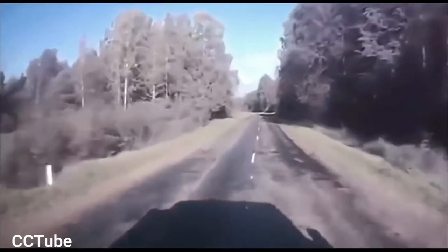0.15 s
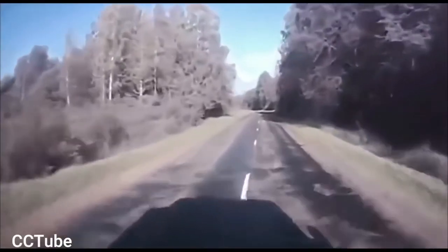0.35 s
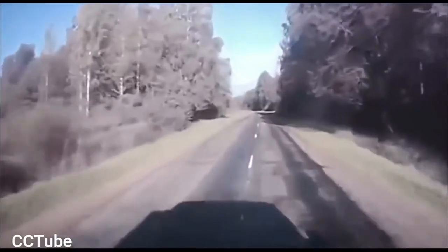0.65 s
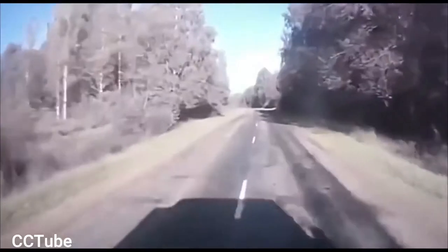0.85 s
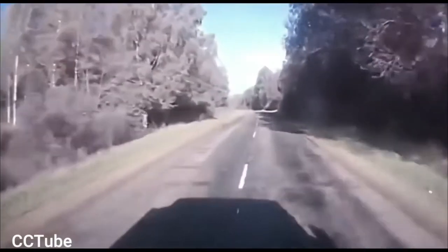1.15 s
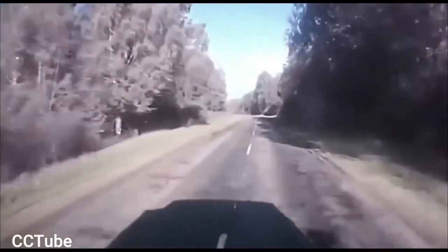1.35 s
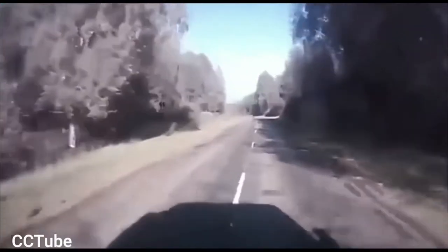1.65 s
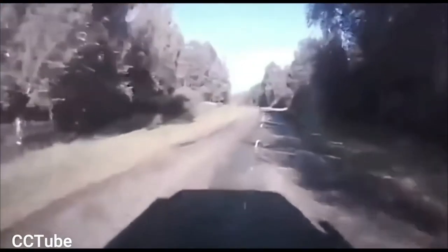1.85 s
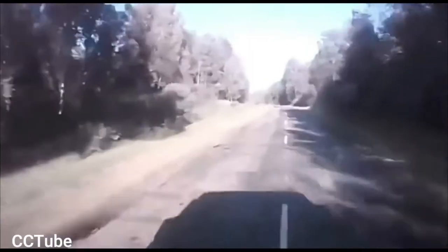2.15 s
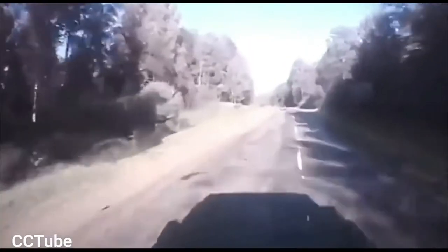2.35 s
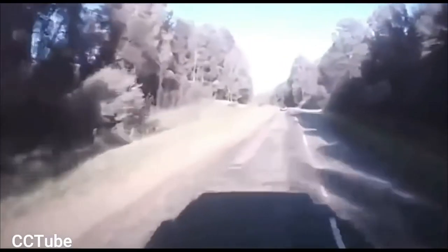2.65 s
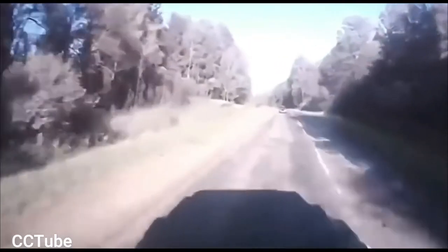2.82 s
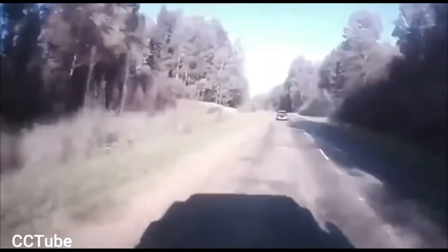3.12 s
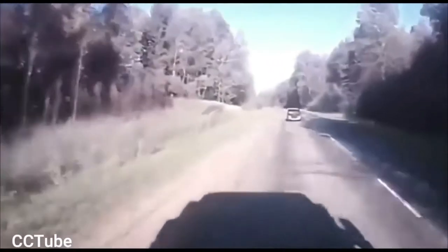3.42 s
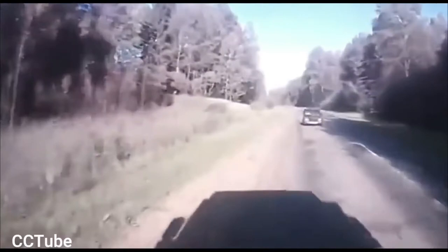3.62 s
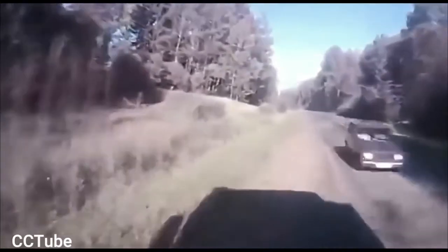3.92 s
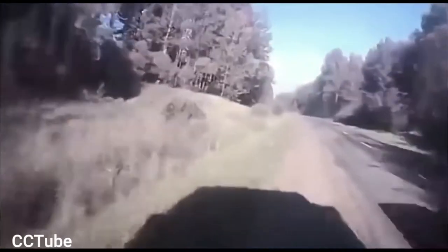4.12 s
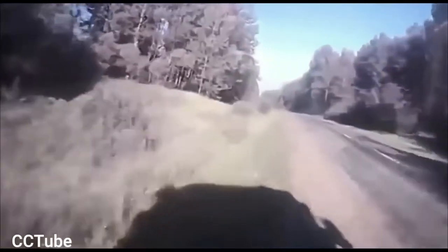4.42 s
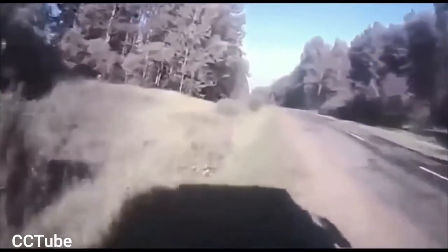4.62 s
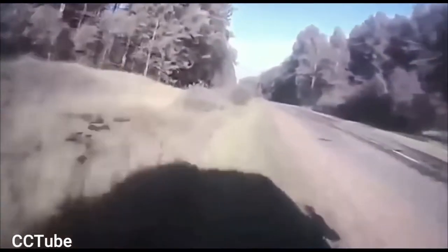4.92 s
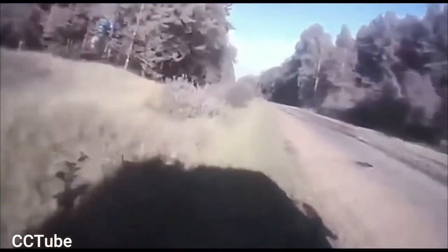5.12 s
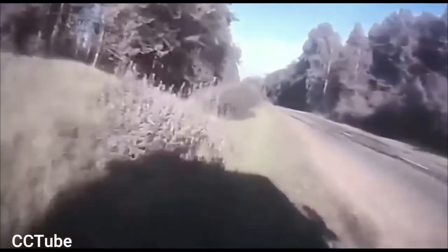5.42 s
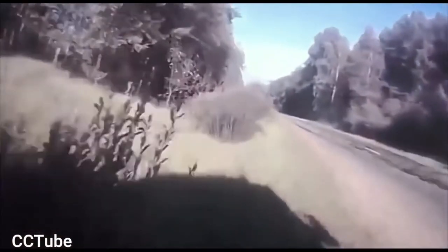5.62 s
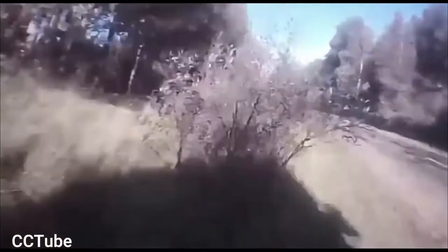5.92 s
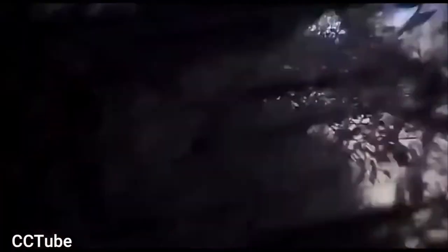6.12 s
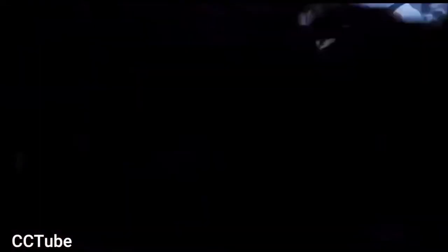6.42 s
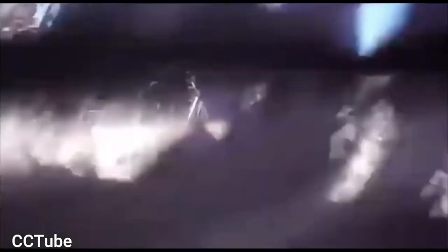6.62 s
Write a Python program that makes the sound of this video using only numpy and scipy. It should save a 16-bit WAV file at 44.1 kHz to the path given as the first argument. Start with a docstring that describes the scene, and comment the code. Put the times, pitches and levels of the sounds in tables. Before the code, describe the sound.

Quiet road roar breaks into a loud bang and rapid clattering knocks from torn tread, easing slightly before twigs and branches smack the car.

```python
"""Inside a car on a country road: body sway, tyre roar and buzzing trim; once a second the wave jumps.
After one soft knock the tyre bursts, and a cheap windscreen camera overloads from the burst on: wave tops flatten
and gain control pulls down. The torn tread slaps the wheel arch once a turn, as clicks and pushes ringing through
panel modes, while the car leaves the road and bumps over the verge. At the end it ploughs into brush: twigs whip,
branches strike, stems drag."""
import sys
import numpy as np
from scipy import signal
from scipy.fft import rfft, irfft
from scipy.io import wavfile
from scipy.ndimage import uniform_filter1d

SR = 44100
rng = np.random.default_rng(int(sys.argv[2]) if len(sys.argv) > 2 else 0)


def digitize_waveform(pressure):
    """Quantize a signal to 16-bit integers and store it at the path in sys.argv[1].

    Rows of a 2-D input are taken as channels; values are limited to [-1, 1].
    """
    field = np.atleast_2d(pressure).T
    bounded = np.clip(field, -1, 1)
    quanta = np.round(bounded * 32767).astype(np.int16)
    wavfile.write(sys.argv[1], SR, quanta)


N = 298557

# Levels of the rolling car, leaping at the burst: [t/s, body sway level/dB, tyre roar level/dB, cabin buzz level/dB]
ROLLING_LEVELS = [(0.0, -68.5, -57, -68.5), (0.5, -77, -52.5, -67.5), (1.0, -79.5, -49.5, -61),
                  (1.4, -77, -45.5, -61.5), (1.75, -47.5, -47.5, -56), (1.77, -19, -29.5, -56.5),
                  (1.95, -38, -35, -41), (2.3, -38.5, -40.5, -37.5), (2.55, -46.5, -37.5, -37),
                  (2.78, -43.5, -38, -49.5), (3.08, -35, -34.5, -34), (3.75, -50.5, -40, -42.5),
                  (4.25, -42, -35, -34), (4.85, -42.5, -36, -39), (5.3, -43.5, -44.5, -42.5),
                  (5.75, -49, -45, -50), (6.2, -36.5, -38.5, -43), (6.77, -56, -27.5, -21.5)]
# Spectrum of the swaying body's pressure swings: [f/Hz, level per Hz/dB]
SWAY_SPECTRUM = [(4, -18.5), (9, -3.5), (15, -1.5), (25, -5.5), (35, -11), (50, -19.5), (70, -39)]
# Spectrum of the tyre roar: [f/Hz, level/dB]
ROAR_SPECTRUM = [(25, -14), (45, -14), (120, -18.5), (270, -24), (480, -31), (630, -25.5), (900, -34),
                 (2100, -42), (2500, -73.5), (5000, -80)]
# Spectrum of the loose trim's buzz: [f/Hz, level per Hz/dB]
BUZZ_SPECTRUM = [(180, -25.5), (300, -2.5), (500, -4), (712, -15.5), (1200, -7), (1860, -15.5), (4260, -29),
                 (5500, -34), (7150, -87), (12100, -120)]
# A soft knock before the burst, then blows of the burst and of the flailing tread; a second, later contact
# follows each; levels before the layer mix:
# [t/s, rattle level/dB, thud level/dB, crack level/dB, knock f/Hz, second contact delay/s, its rattle level/dB]
BLOWS_AND_ENDS = [(1.5, -45.5, -46, -50, 258, .03, -58.5), (1.767, -8.5, -17, -8, 248.3, .013, -11),
                  (1.804, -15.5, -22, -11.5, 298, 0.0083, -32), (1.822, -17, -23.5, -22, 255, 0.014, -26),
                  (1.858, -19, -16, -29.5, 265, 0.016, -30), (1.894, -10, -18, -24, 270, 0.041, -26),
                  (2.02, -13.5, -20.5, -22, 273, 0.028, -25.5), (2.09, -16.5, -28, -44.5, 502, .027, -24),
                  (2.157, -16.5, -20.5, -41, 443, 0.011, -28), (2.25, -39, -38, -57.5, 291, 0.017, -42),
                  (2.33, -18.5, -22, -31, 415, 0.016, -24.5), (2.37, -20, -47, -29.5, 313, 0.016, -29),
                  (2.444, -43.5, -42, -40, 374, .03, -51.5), (2.521, -23, -42.5, -28, 454, 0.045, -19.5),
                  (2.732, -38.5, -35, -62.5, 325, 0.025, -54.5),
                  (2.796, -13.5, -30, -30, 350, 0.053, -34.5), (2.924, -29.5, -29.5, -48, 361, .03, -44),
                  (2.987, -10, -25, -26, 405, 0.046, -35), (3.153, -7.5, -30.5, -23.5, 538, .017, -24.5),
                  (3.351, -15, -16.5, -25, 277, 0.035, -31.5), (3.408, -32.5, -40, -44, 227, .015, -42.5),
                  (3.482, -36.5, -31.5, -43, 228, .03, -64),
                  (3.553, -14.5, -20.5, -29, 304.5, 0.024, -33.5),
                  (3.666, -32, -40.5, -40.5, 466, .03, -47), (3.734, -7, -20, -18, 251, .033, -19),
                  (3.825, -30, -34.5, -56, 268, .03, -53), (3.913, -26.5, -35, -56.5, 251, .064, -28.5),
                  (4.02, -17.5, -18.5, -26.5, 352, 0.042, -27.5),
                  (4.136, -13, -20, -25.5, 350, .037, -29.5), (4.257, -19, -24.5, -31.5, 452, 0.029, -29.5),
                  (4.371, -16.5, -26.5, -31, 362, .026, -25), (4.483, -23, -34, -33, 273.5, 0.027, -26.5),
                  (4.599, -18, -21, -27, 381, 0.019, -24), (4.712, -15, -22, -26, 516, .037, -27),
                  (4.839, -14.5, -25.5, -30, 367, 0.034, -37), (4.954, -18, -30.5, -33, 330, .029, -28),
                  (5.085, -17.5, -42, -45, 529, 0.022, -43.5), (5.18, -40, -40.5, -47.5, 238, 0.016, -46),
                  (5.221, -23.5, -29, -47.5, 509, .03, -45), (5.313, -32, -34, -43.5, 372, 0.045, -27.5),
                  (5.47, -39.5, -36, -51.5, 358, 0.029, -37), (5.516, -29, -28, -43.5, 425, 0.026, -47),
                  (5.636, -33, -43, -54.5, 300, 0.027, -36.5), (5.794, -44.5, -39.5, -46, 223, 0.011, -39),
                  (5.82, -26.5, -29, -34, 360, 0.023, -27.5), (5.934, -27, -40, -39, 372, 0.035, -23),
                  (6.111, -22.5, -26.5, -33.5, 352, 0.029, -31),
                  (6.404, -18, -20.5, -33.5, 343, .03, -46.5)]
# Modes of the floor pan: [f/Hz, level/dB, t60/s]
FLOOR_MODES = [(39, -5.5, 0.15), (68, -9, 0.19), (106.4, 9.5, 0.088), (151, -0.5, 0.069)]
# Modes of the arch and panels: [f/Hz, level/dB, t60/s]
PANEL_MODES = [(258, -22.5, 0.0096), (350, 3, 0.032), (494.7, 6.5, 0.038), (627.4, 0, 0.049),
               (805, 4, 0.023), (1061, 2, 0.021), (1208, 11, 0.0081)]
# Modes of the loose trim: [f/Hz, level/dB, t60/s]
TRIM_MODES = [(1620, 15, 0.0034), (2180, 7.2, 0.0088), (2840, 0.5, 0.01), (4220, 0.5, 0.0099),
              (5410, 1, 0.017)]
# Stems dragged under the floor, level before the layer mix: [t/s, level/dB]
STEM_LEVELS = [(6.235, -44.5), (6.283, -22.5), (6.395, -36.5), (6.473, -27), (6.55, -27), (6.7, -38.5),
               (6.77, -33.5)]
# Bunches of twigs that whip across the car, level before the layer mix: [start t/s, length/s, level/dB]
TWIG_BUNCHES = [(6.272, 0.011, -24), (6.28, 0.014, -10.5), (6.297, 0.016, -25), (6.328, 0.011, -26),
                (6.35, 0.014, -36), (6.411, 0.051, -31.5), (6.44, 0.021, -25.5), (6.474, 0.012, -29),
                (6.501, 0.057, -12.5), (6.576, 0.05, -24), (6.642, 0.029, -31), (6.657, 0.029, -23),
                (6.711, 0.016, -34.5), (6.723, 0.025, -17.5)]
# Single branches that strike hard, starting level before the layer mix: [t/s, level/dB]
BRANCH_STRIKES = [(6.2505, -27.5), (6.2623, -20.5), (6.2818, -34), (6.327, -19), (6.454, -16),
                  (6.4953, 2.5), (6.5172, -7.5), (6.583, -13), (6.6505, -7), (6.67, -10), (6.715, -24.5),
                  (6.7291, -16)]
# Modes of the sheet metal and glass under the branches: [f/Hz, level/dB, t60/s]
SKIN_MODES = [(497, -20.5, 0.0042), (811, -13, 0.048), (1230, -2.5, 0.012), (1610, 10, 0.0057),
              (2177, 4, 0.012), (2935, -2.5, 0.014), (4500, 6.5, 0.0021)]
# Microphone that leans to the bass: [f/Hz, level/dB]
CAPSULE_RESPONSE = [(20, 6.5), (4600, -6.5)]
# Narrow audio path of the camera: [f/Hz, level/dB]
PATH_RESPONSE = [(20, 3), (300, -0.5), (4600, -6), (5300, -15), (5900, -30), (6500, -28.5), (8800, -26.5),
                 (10000, -36), (15000, -50.5)]
# Jumps of the wave in turn, before their treble is softened: [signed height]
JUMP_HEIGHTS = [.07, -.06, -.045, -.04, -.05, .07]

BURST_S = 1.765
BLOW_T60_S = 0.072  # basic die-away of a blow, stretched for each layer
END_THUD_DB, END_CRACK_DB = -1.5, -12  # loose end's thud and crack against its rattle
END_LOW_HZ, END_HIGH_HZ = 234, 536  # the loose end lands anywhere on the arch
SCRAPE_DB, SCRAPE_SWELL_S = -9.5, 0.043  # the tread drags along the arch around each blow
WHIP_IN_S, WHIP_OUT_T60_S = 0.0014, 0.058
FIRST_JUMP_S, JUMP_EVERY_S = 1.0779, .99844
EDGE_HZ = 15700  # top of the recorded band


def gain_of(db):
    """Turns decibels into an amplitude factor."""
    return 10 ** (np.asarray(db) / 20)


def evened(x):
    """Brings a signal to an rms of 1."""
    return x / np.sqrt(np.mean(x ** 2) + 1e-20)


def read(points, hz):
    """Reads a response in dB, drawn straight between its points on a log frequency axis."""
    f, db = np.transpose(points)
    return np.interp(np.log(hz + 1), np.log(f + 1), db)


def along(rows, column):
    """Gain that follows one dB column of a curve, silent before it starts."""
    rows = np.asarray(rows)
    return gain_of(np.interp(np.arange(N) / SR, rows[:, 0], rows[:, column], left=-200))


def coloured(x, points):
    """Shapes a signal's spectrum by a drawn response, leaving its phase alone."""
    response = gain_of(read(points, np.fft.rfftfreq(N, 1 / SR)))
    return irfft(rfft(x) * response, N)


def clicks(per_s, spread_db):
    """Random clicks of either sign, their sizes spread in dB, at an rms of 1."""
    size_db = spread_db * np.minimum(rng.exponential(1, N), 4)
    size = gain_of(size_db) * rng.choice([-1, 1], N)
    return evened(size * (rng.random(N) < per_s / SR))


def ring(drive, modes):
    """Passes a drive through dying sine modes of total energy 1."""
    t = np.arange(SR // 4) / SR
    tap = sum(gain_of(db - 60 * t / t60) * np.sin(2 * np.pi * hz * t) for hz, db, t60 in modes)
    return signal.oaconvolve(drive, tap / np.linalg.norm(tap))[:N]


def scattered(drive, modes, spread):
    """Contacts wander over five spots, where the same modes lie a little higher or lower."""
    spot = rng.integers(0, 5, N // 200 + 1).repeat(200)[:N]  # a new draw every 200 samples
    total = np.zeros(N)
    for k, shift in enumerate(np.linspace(1 - spread, 1 + spread, 5)):
        shifted_modes = [(hz * shift, db, t60) for hz, db, t60 in modes]
        total += ring(drive * (spot == k), shifted_modes)
    return total


def rolling():
    """Slow pressure swings of the swaying body, tyre roar, and loose trim that buzzes as dense clicks."""
    sway_noise, roar_noise, lump_noise = rng.standard_normal((3, N))
    sway = evened(coloured(sway_noise, SWAY_SPECTRUM))
    # roar and buzz swell and fade together, by 3.2 dB rms
    lumps = gain_of(3.2 * evened(coloured(lump_noise, [(3, 0), (20, -3), (60, -30)])))
    roar = evened(lumps * coloured(roar_noise, ROAR_SPECTRUM))
    buzz = evened(lumps * coloured(clicks(2500, spread_db=0.0), BUZZ_SPECTRUM))
    sway = along(ROLLING_LEVELS, column=1) * sway
    roar = along(ROLLING_LEVELS, column=2) * roar
    buzz = along(ROLLING_LEVELS, column=3) * buzz
    return sway + roar + buzz


def contacts():
    """Every blow and second contact as [t/s, rattle level/dB, thud level/dB, crack level/dB, knock f/Hz]."""
    blows = np.array(BLOWS_AND_ENDS)
    end_s = blows[:, 0] + blows[:, 5]
    end_db = blows[:, 6]
    end_hz = END_LOW_HZ + (END_HIGH_HZ - END_LOW_HZ) * rng.random(len(blows))
    ends = np.transpose([end_s, end_db, end_db + END_THUD_DB, end_db + END_CRACK_DB, end_hz])
    return np.vstack([blows[:, :5], ends])


def blow_envelope(hits, column, stretch, rise_s):
    """Power sum of the blows: each rises, holds briefly, then drops away."""
    power, t = np.zeros(N + SR), np.arange(SR // 4) / SR
    fall = gain_of(-60 * (t / (stretch * BLOW_T60_S)) ** 1.663)  # the exponent makes the hold
    shape = (1 - np.exp(-t / rise_s)) * fall
    for row in hits:
        power[round(row[0] * SR):][:len(t)] += (shape * gain_of(row[column])) ** 2
    return np.sqrt(power[:N])


def tread():
    """Each blow thumps the floor pan, knocks the arch, shakes panels and cracks trim; after the burst it scrapes."""
    hits = contacts()
    push, knock, t = np.zeros(N), np.zeros(N + SR), np.arange(SR // 5) / SR
    for s, rattle_db, thud_db, _, hz in hits:
        push[round(s * SR)] -= gain_of(thud_db)
        swing = np.sin(2 * np.pi * hz * t) * (1 - np.exp(-t / 0.00057))
        knock[round(s * SR):][:len(t)] -= gain_of(rattle_db - 60 * t / (1.33 * BLOW_T60_S)) * swing

    thud_env = blow_envelope(hits, column=2, stretch=1.52, rise_s=0.0099)
    rumble = ring(clicks(600, spread_db=6.5) * thud_env, FLOOR_MODES)
    thump = 22 * ring(push, FLOOR_MODES) + rumble

    rattle_env = blow_envelope(hits, column=1, stretch=1.0, rise_s=0.00048)
    rattle = scattered(clicks(900, spread_db=1.5) * rattle_env, PANEL_MODES, spread=0.059)

    crack_env = blow_envelope(hits, column=3, stretch=1.26, rise_s=0.00033)
    crack = scattered(clicks(1500, spread_db=5.5) * crack_env, TRIM_MODES, spread=0.087)

    drag_env = blow_envelope(hits, column=1, stretch=1.34, rise_s=0.0081)
    drag = uniform_filter1d(drag_env, round(SCRAPE_SWELL_S * SR))
    drag = drag * (np.arange(N) / SR > BURST_S)  # nothing is torn before the burst
    scrape_modes = PANEL_MODES[2:] + TRIM_MODES[:3]
    scrape = scattered(clicks(1200, spread_db=3.5) * drag, scrape_modes, spread=0.068)
    return gain_of(SCRAPE_DB) * scrape + 0.92 * thump + 1.05 * knock[:N] + 1.125 * rattle + 2.23 * crack


def whipping():
    """Gain of the twigs: each bunch sets in fast, holds while it passes, and lets go."""
    t, total = np.arange(N) / SR, np.zeros(N)
    for s, length, db in TWIG_BUNCHES:
        fall_db = 60 * np.maximum(t - s - length, 0) / WHIP_OUT_T60_S
        total += gain_of(db - fall_db) * np.clip((t - s) / WHIP_IN_S, 0, 1)
    return total


def brush():
    """Dense whipping of twigs, hard branch strikes on metal and glass, and stems dragged under the floor."""
    drive = whipping() * clicks(3000, spread_db=6.5)
    t = np.arange(400) / SR
    for s, db in BRANCH_STRIKES:
        strike = gain_of(db - 60 * t / 0.015) * rng.standard_normal(len(t))
        drive[round(s * SR):][:len(t)] += strike
    stem_drive = along(STEM_LEVELS, column=1) * clicks(730, spread_db=6.5)
    stems = ring(stem_drive, FLOOR_MODES[1:] + PANEL_MODES)
    return 3.6 * scattered(drive, SKIN_MODES, spread=0.078) + 1.2 * stems


def scene():
    """Sums the car, the tread and the brush, alike in both channels."""
    mono = rolling() + tread() + brush()
    return np.array([mono, mono])


def overload(x):
    """Lopsided flattening of the wave tops: the upper side bends at a lower height than the lower."""
    limit = np.where(x > 0, .15, .33)
    return x / (1 + abs(x / limit) ** 3) ** (1 / 3)


def gain_control(x):
    """Turns down whatever exceeds -21.5 dB, following held peaks of power that recover slowly."""
    power_db = 10 * np.log10(abs(uniform_filter1d(x ** 2, 1500)) + 1e-12)
    fall = np.arange(N) * .9 / SR  # recovery of 0.9 dB a second
    held_db = np.maximum.accumulate(power_db + fall) - fall
    over_db = np.maximum(held_db + 21.5, 0)
    keep = np.exp(-1 / (.13 * SR))  # the gain takes a moment to come down
    return x / gain_of(signal.lfilter([1 - keep], [1, -keep], over_db))


def wave_jumps():
    """Once a second the wave drifts one way, snaps across and settles back."""
    t, snaps = np.arange(-1200, 1200) / SR, np.zeros(N)
    times = FIRST_JUMP_S + JUMP_EVERY_S * np.arange(len(JUMP_HEIGHTS))
    for s, height in zip(times, JUMP_HEIGHTS):
        snap = height / 2 * np.sign(t + 1e-9) * np.exp(-abs(t) / 0.013)
        snaps[round(s * SR) - 1200:][:len(t)] += snap
    return coloured(snaps, [(5000, -0.5), (9000, -3), (11000, -15.0), (15000, -20)])


def channel_difference(y):
    """The two channels never quite match: a faint, fluttering share of the sound sits at the sides."""
    flutter = .5 + evened(coloured(rng.standard_normal(N), [(60, 0), (200, -60)]))
    return coloured(y * flutter, [(60, -39), (250, -35), (700, -27), (2000, -26), (5000, -21),
                                  (8000, -18), (11000, -40)])


def record(dry):
    """Lopsided overload, gain control, narrow audio path, jumps, converter bias, hiss and band limit."""
    x = gain_of(0.5) * coloured(dry.mean(0), CAPSULE_RESPONSE)
    y = coloured(gain_control(overload(x)), PATH_RESPONSE)
    y = y + wave_jumps()
    side = channel_difference(y)
    bias = 0.012 * np.clip(np.arange(N) / SR / 2.2, 0, 1)  # converter's offset, fading in over 2.2 s
    # hiss mostly shared, with a little of each channel's own
    hiss = gain_of(-94) * (rng.standard_normal(N) + .25 * rng.standard_normal((2, N)))
    out = y - y.mean() + bias + np.array([-side, side]) + hiss
    band_limit = signal.firwin(511, EDGE_HZ, window=("kaiser", 9), fs=SR)
    return signal.oaconvolve(out, band_limit[None], "same")


dry = scene()
out = record(dry)
digitize_waveform(out)
```